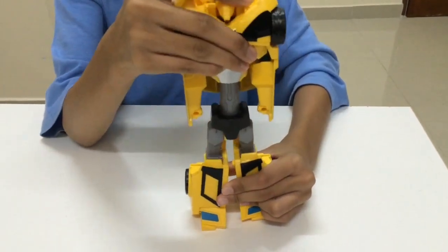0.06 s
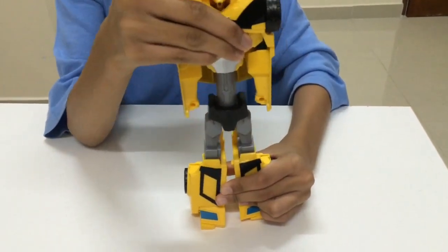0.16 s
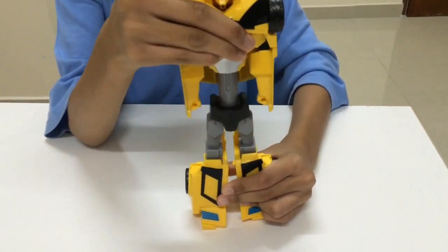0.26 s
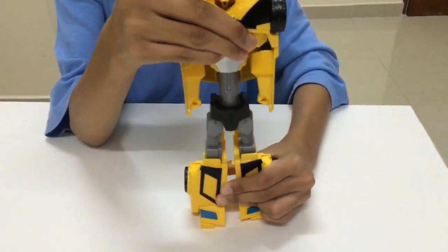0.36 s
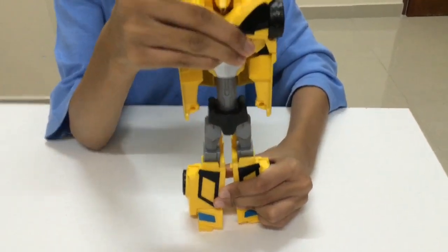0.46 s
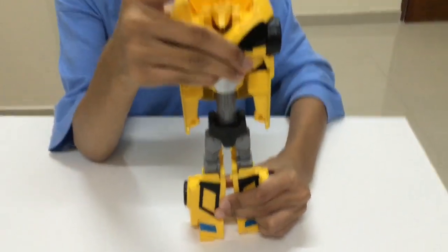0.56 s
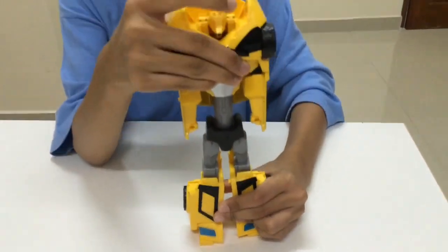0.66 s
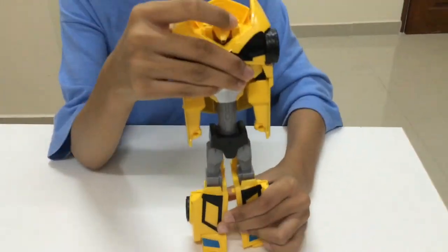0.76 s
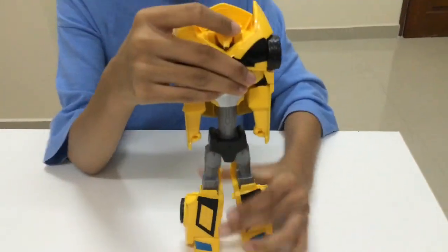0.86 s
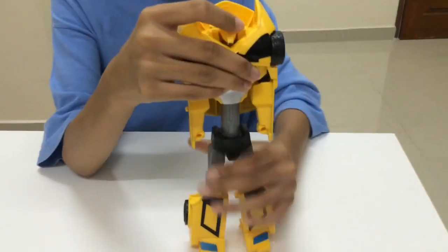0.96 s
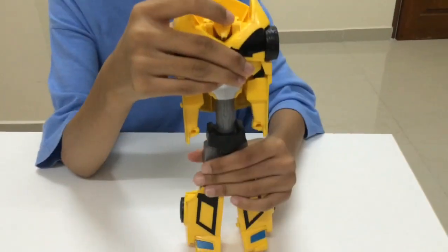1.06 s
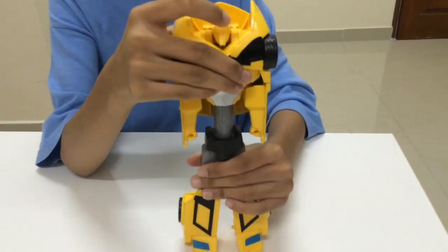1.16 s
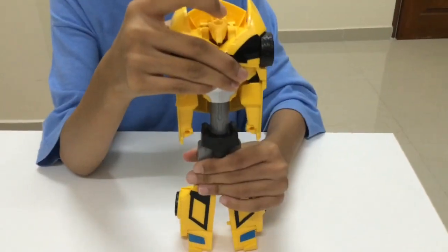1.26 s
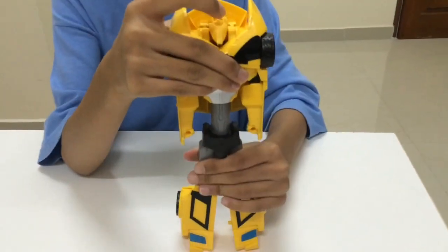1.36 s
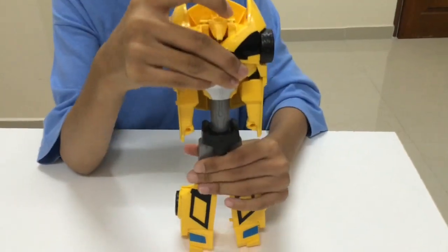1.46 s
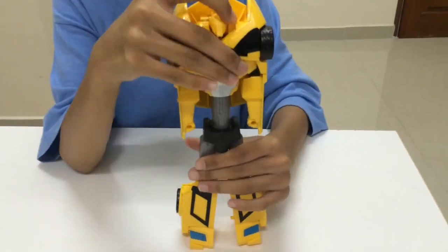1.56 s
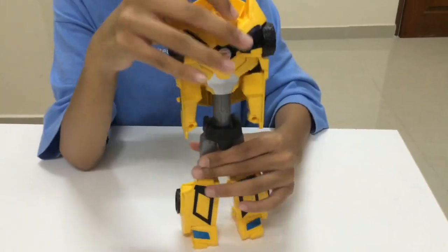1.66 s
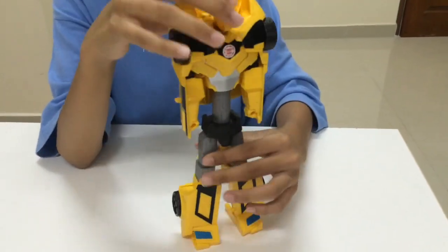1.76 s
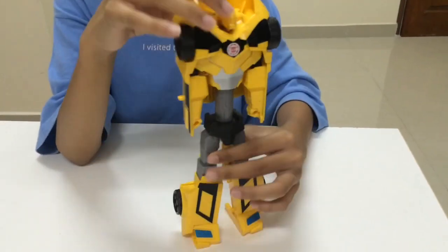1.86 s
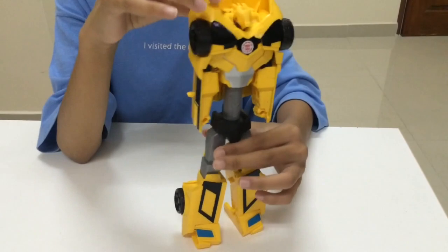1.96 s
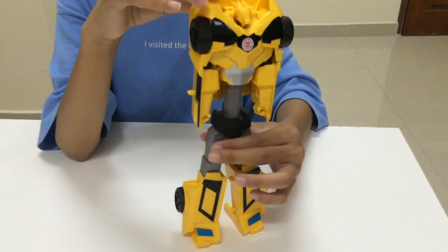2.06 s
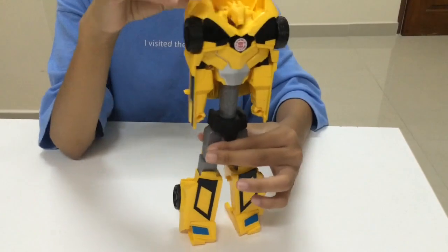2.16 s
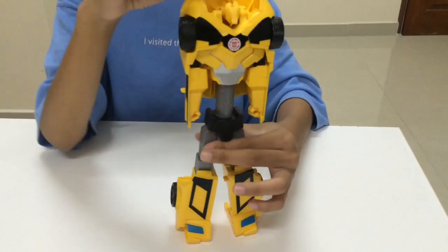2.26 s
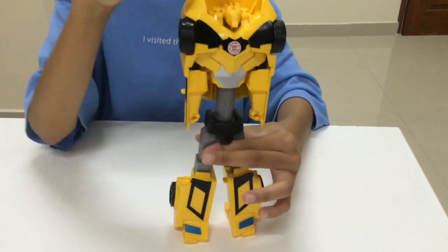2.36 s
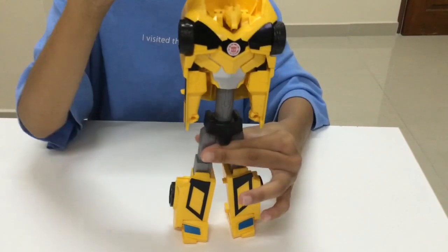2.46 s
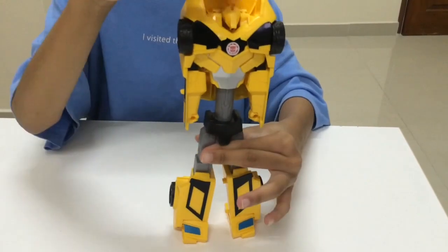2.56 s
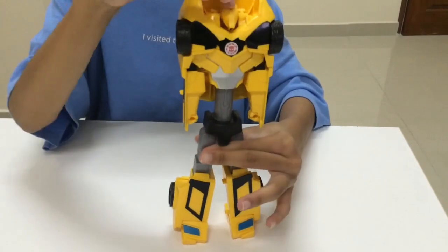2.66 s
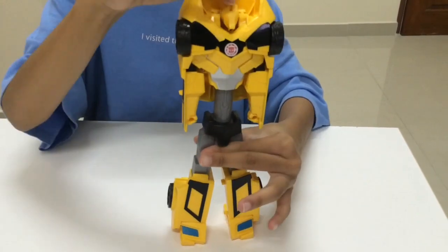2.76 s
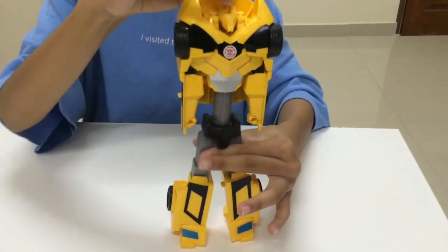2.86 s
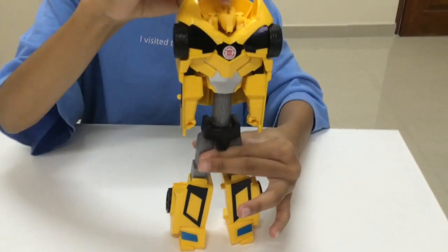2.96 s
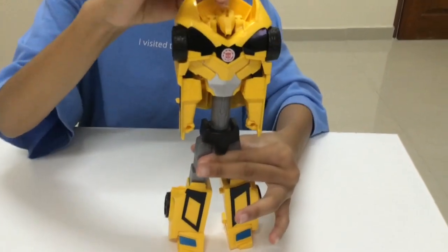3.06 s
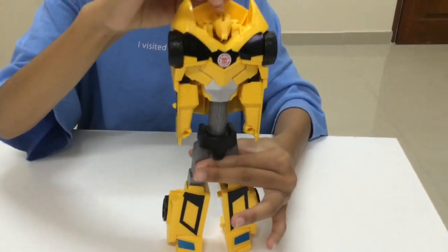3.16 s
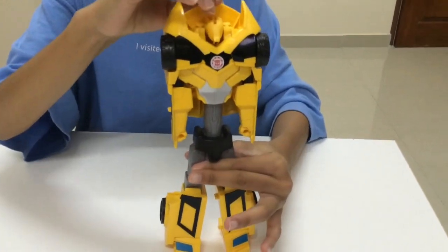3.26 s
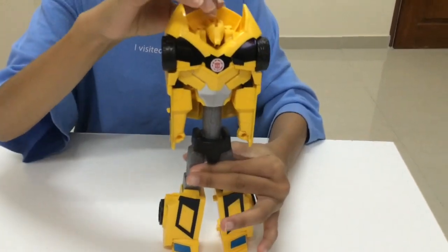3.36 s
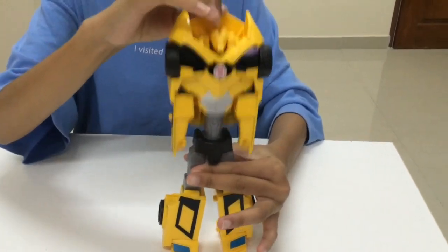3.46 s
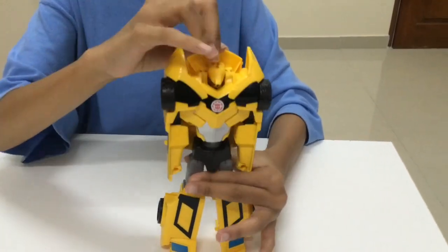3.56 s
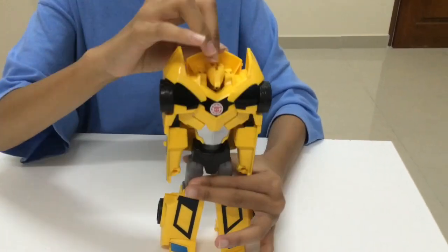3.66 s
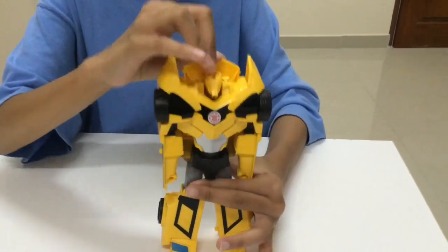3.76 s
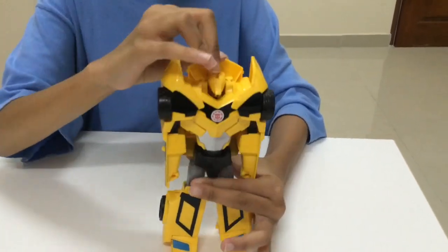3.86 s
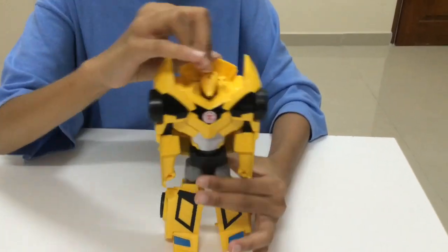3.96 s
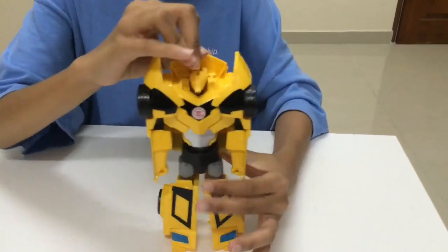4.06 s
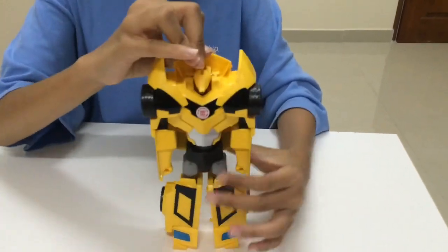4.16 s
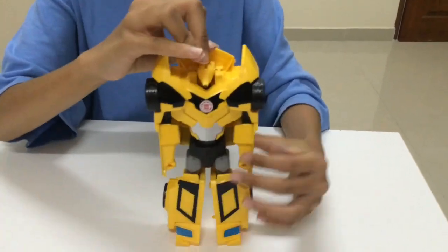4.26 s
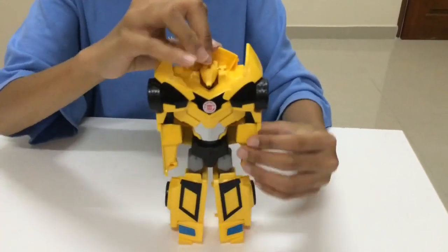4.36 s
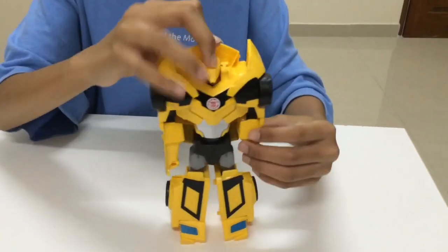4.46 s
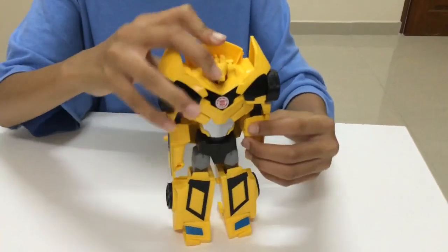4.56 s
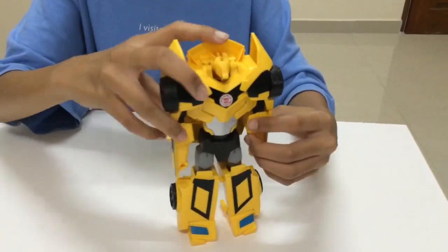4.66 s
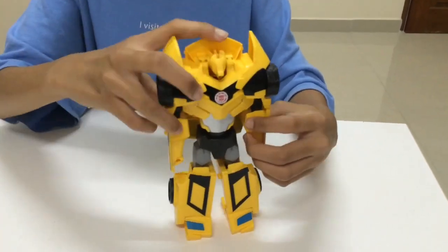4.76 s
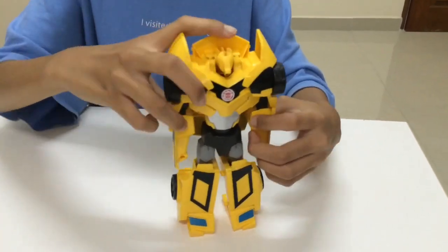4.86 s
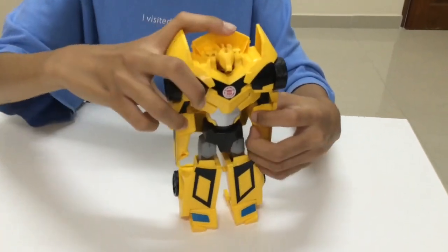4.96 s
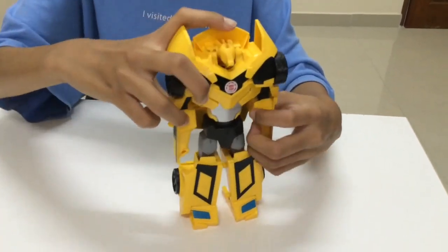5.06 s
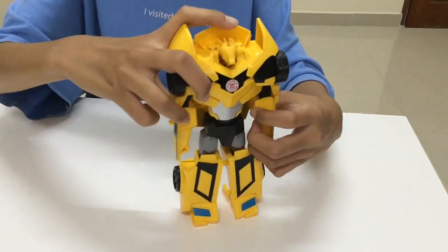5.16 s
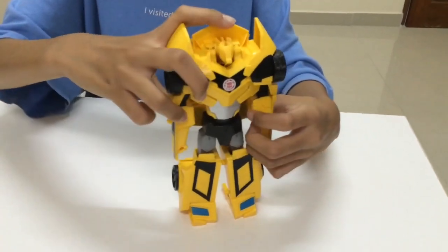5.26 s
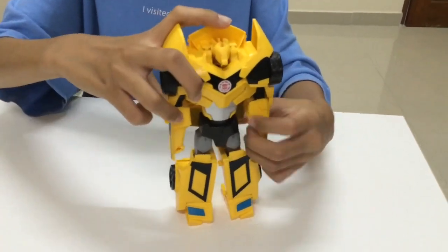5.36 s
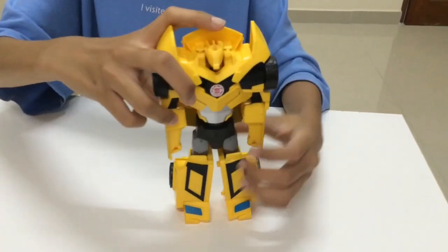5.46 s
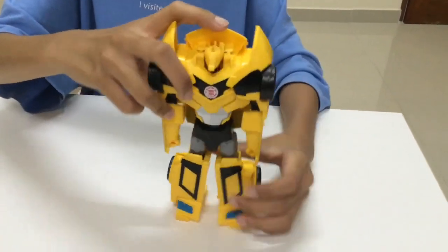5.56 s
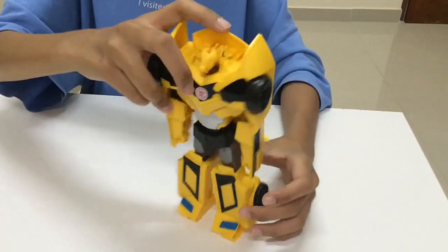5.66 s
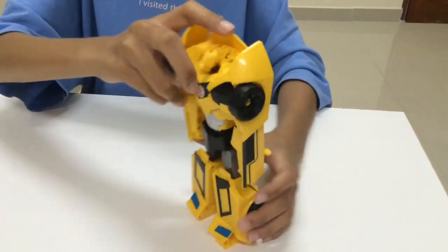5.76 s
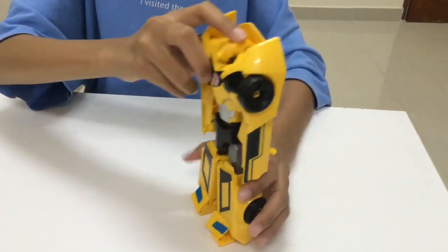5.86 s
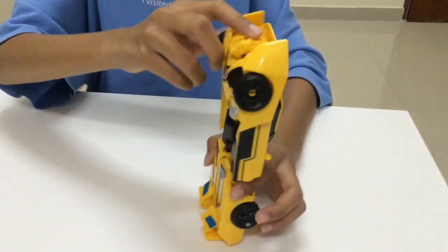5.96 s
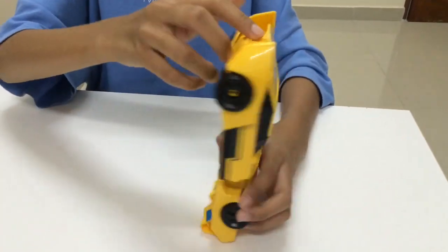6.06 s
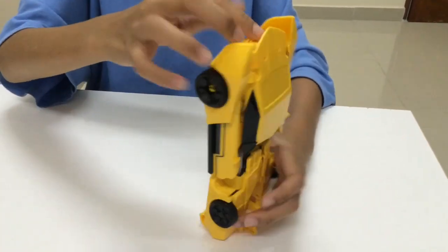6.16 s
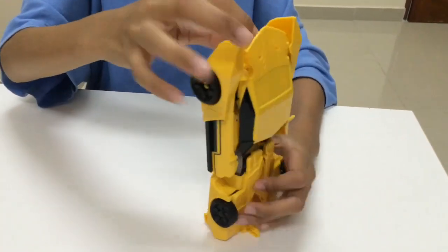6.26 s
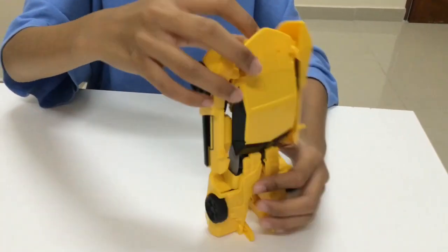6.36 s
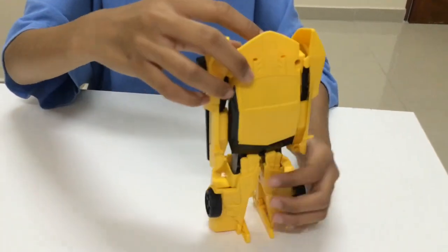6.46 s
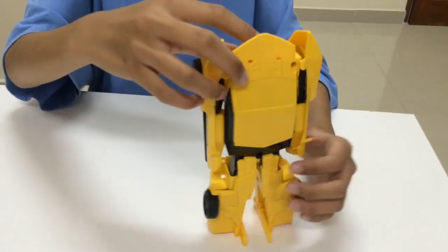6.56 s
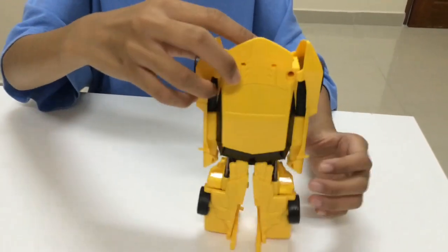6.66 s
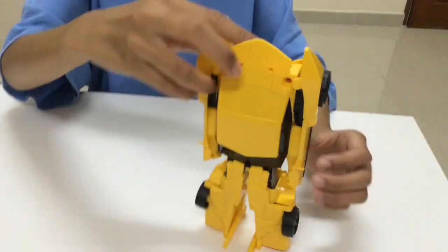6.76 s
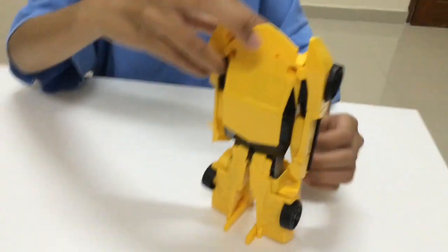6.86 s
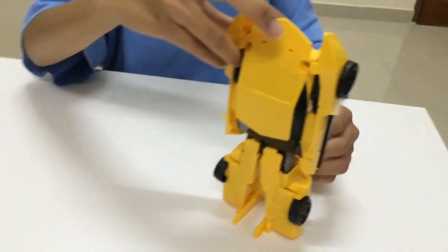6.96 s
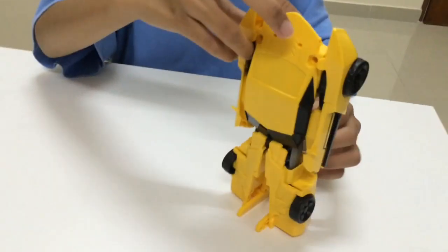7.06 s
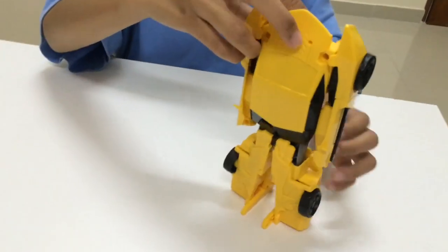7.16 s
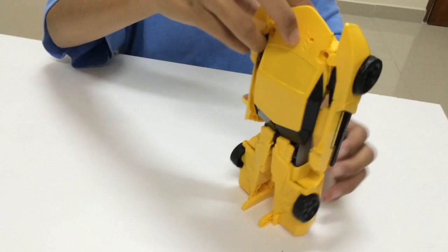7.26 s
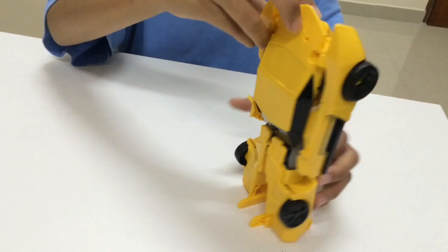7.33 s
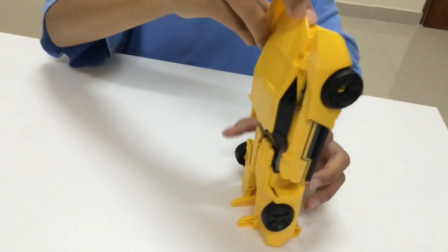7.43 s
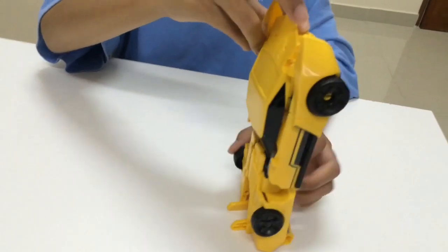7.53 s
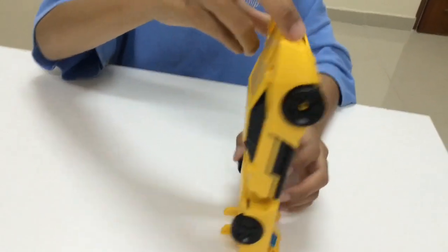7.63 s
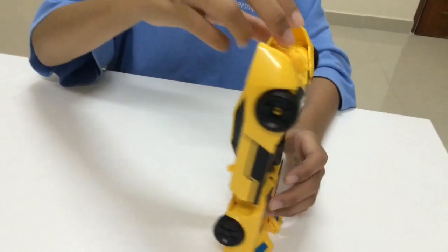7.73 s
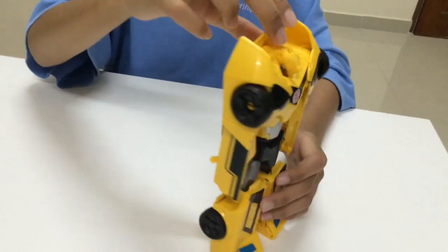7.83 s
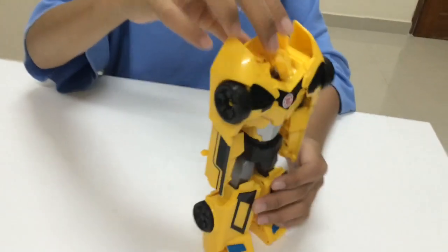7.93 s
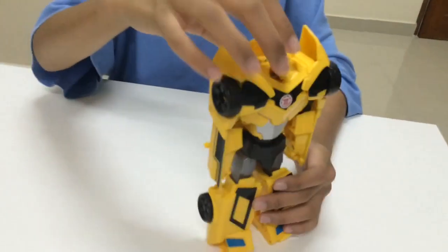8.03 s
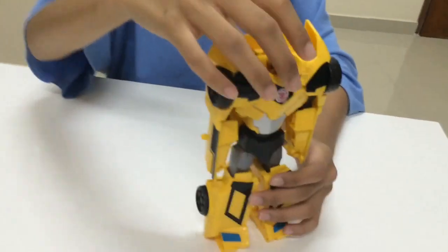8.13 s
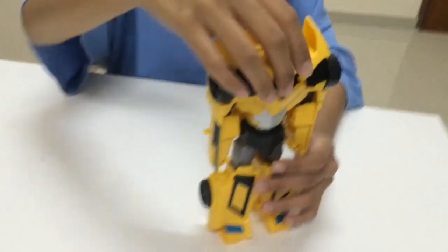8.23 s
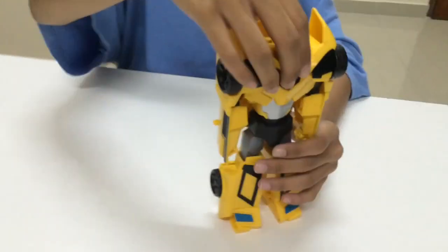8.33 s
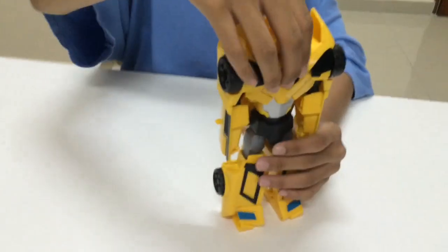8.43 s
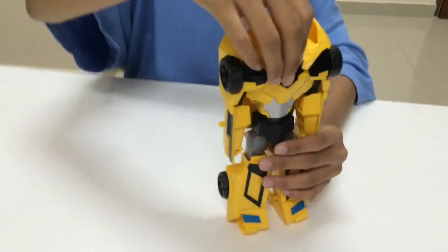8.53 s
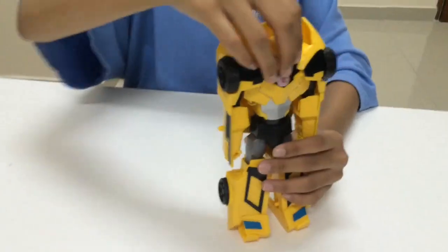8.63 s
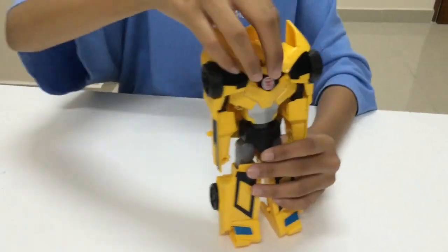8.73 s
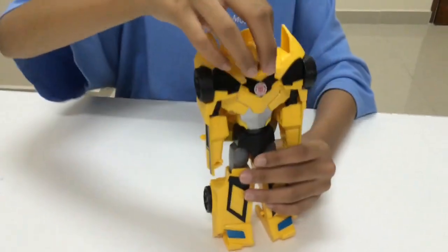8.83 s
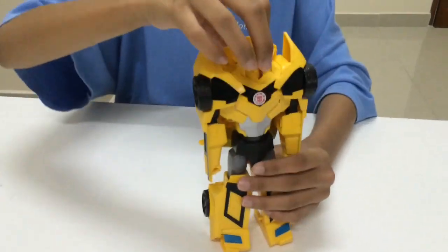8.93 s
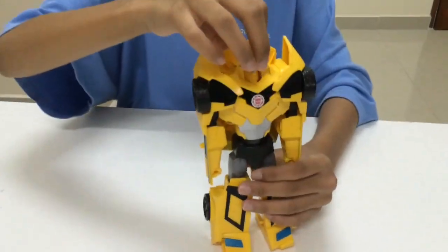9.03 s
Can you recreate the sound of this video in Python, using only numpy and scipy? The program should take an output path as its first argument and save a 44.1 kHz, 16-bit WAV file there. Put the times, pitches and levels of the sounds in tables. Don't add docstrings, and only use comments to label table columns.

```python
import sys
import numpy as np
from scipy import signal
from scipy.fft import rfft, irfft, next_fast_len
from scipy.io import wavfile
from scipy.ndimage import uniform_filter1d, map_coordinates

SR = 44100
rng = np.random.default_rng(int(sys.argv[2]) if len(sys.argv) > 2 else 0)


def level_to_linear(level):
    exponent = np.asarray(level, float) / 20
    return 10 ** exponent


def output_pcm(signal):
    pcm = np.clip(np.atleast_2d(signal).T, -1, 1) * 32767
    wavfile.write(sys.argv[1], SR, np.round(pcm).astype(np.int16))


N = 400869

# start in seconds, peak in dB, strongest panel tone in Hz, brightness in dB.
SNAPS = [(.5841, -48, 1800, -26), (1.2062, -27, 4030, -6), (3.6034, -23, 3560, -2), (3.6246, 0, 3880, -1.5),
         (3.8385, -13, 4500, 6), (3.8565, -14.5, 12500, -2), (3.8663, -8, 4130, -3),
         (4.0483, -31, 2860, -24), (4.089, -22.5, 3200, -11), (4.1035, -17, 4470, -12.5),
         (4.1158, -24, 3150, -11), (4.6008, -35.5, 4140, -2.5), (4.7256, -27, 3180, -12.5),
         (4.76, -26, 4240, -17), (4.9917, -26, 10500, -12), (5.4411, -21.5, 4460, -3.5),
         (5.8976, -54.5, 2330, -25), (5.9394, -27, 4040, -13), (5.996, -34.5, 3260, -29),
         (6.2385, -19, 3370, -5), (6.366, -39, 3200, -41), (6.4661, -35, 2390, -51),
         (6.7312, -33, 1850, -31), (7.2186, -34.5, 10300, -7), (7.2372, -28.5, 4930, -16),
         (7.2534, -23.5, 2390, 0.5), (7.3148, -31, 3400, -15), (7.5901, -19.5, 3150, -10)]
# start in seconds, peak in dB, strongest panel tone in Hz,
# brightness in dB.
TICKS = [(.078, -27, 9000, -5), (.709, -44, 3070, -4), (1.1212, -28.5, 4030, -9.5),
         (1.3419, -29.5, 2400, -16), (2.168, -37.5, 3450, -31), (2.379, -42, 3500, -8.5),
         (2.7432, -48, 2420, -48), (3.2544, -29.5, 2770, -6), (3.5822, -7.5, 3730, -27),
         (3.5916, -4.5, 3100, -5.5), (3.8912, -29, 3080, -47), (3.957, -40, 2500, -25),
         (4.0246, -28, 2000, -45), (4.0314, -25.5, 4500, -6), (4.2419, -24, 3760, -11.5),
         (4.7394, -27, 2960, -29), (3.333, -40.5, 2870, -19), (5.2696, -22.5, 3200, -9.5),
         (5.52, -40, 1870, -13), (5.8644, -29, 3420, -11), (6.0473, -33, 3150, -42),
         (6.2264, -34, 3200, -21), (6.4863, -27.5, 1860, -9.5), (6.56, -33, 2300, -40),
         (7.6433, -35, 2960, -8), (7.8125, -33, 4800, -21), (8.5625, -44, 3300, -29),
         (8.9815, -16.5, 5730, -21)]
# start in seconds, peak in dB, strongest panel tone in Hz, brightness in dB.
CLACKS = [(.04, -41, 2550, -16), (.2155, -14, 10440, -5.5), (.2383, -16, 4300, -5), (.2484, -28, 3800, -14),
          (.315, -35, 2860, -18), (.519, -46, 1650, -5.5), (.9175, -14, 3370, -9),
          (.9595, -20.5, 2400, -14.5), (1.698, -31, 3980, -22), (2.4623, -34.5, 2400, -57),
          (2.546, -26.5, 3650, -11.5), (3.5954, -8.5, 4030, -5), (4.0125, -30, 1800, -12),
          (4.057, -30.5, 3190, -17.5), (4.851, -28, 2330, -49), (4.9929, -26, 3350, -23),
          (5.1557, -37, 1870, -12.5), (5.6492, -48, 1940, -9), (5.6616, -33, 2700, -54),
          (5.8225, -31.5, 3680, -12), (6.0206, -33.5, 4060, -26), (6.1222, -23, 4600, -11),
          (6.1873, -25.5, 3380, -9.5), (6.2315, -19.5, 3250, -10.5), (7.4361, -40, 4720, -11),
          (7.6568, -27, 7370, -6.5), (8.3688, -47, 3190, -17), (8.7826, -39, 1664, -26)]
# start in seconds, peak in dB, strongest panel tone in Hz,
# brightness in dB.
RATTLES = [(.0144, -37, 2610, -12), (.1945, -22.5, 1500, -6), (.2054, -25.5, 3270, -7),
           (.2277, -23, 3030, -4), (.2596, -22, 2930, -33), (.4215, -41, 1540, -11.5),
           (.7352, -33, 3020, -32), (1.0428, -21.5, 3400, -8.5), (1.2256, -23, 2470, -8),
           (1.3129, -30, 2470, -62), (2.028, -30, 3000, -5), (2.0365, -24, 3720, -10),
           (2.0988, -19.5, 2370, -5.5), (3.236, -30.5, 2000, -12), (4.453, -23.5, 2500, -40),
           (4.7656, -22.5, 2820, -23), (5.0029, -26.5, 4300, -17.5), (5.9158, -21, 2930, -9),
           (6.0328, -52, 3240, -37), (6.1305, -18.5, 3480, -8), (7.4555, -35, 2140, -35),
           (7.517, -35, 4200, -9), (8.9825, -29, 3710, -16)]
# start in seconds, peak in dB, strongest panel tone in Hz,
# brightness in dB.
TAPS = [(.007, -34, 3930, -21), (.092, -40, 2800, -39), (.184, -24, 4170, -8), (.775, -41, 3280, -30),
        (.849, -42, 3800, -25), (.983, -30, 4300, -22), (1.111, -31, 3820, -21), (1.2105, -26, 3760, -16),
        (1.245, -28, 2500, -17), (1.272, -33, 4540, -22), (1.286, -34, 3480, -28), (1.956, -52, 3500, -8),
        (2.277, -50, 3200, -25), (2.313, -51, 3500, -25), (2.333, -46, 4040, -27), (2.683, -50, 3000, -15),
        (3.5962, -11, 1740, -9), (3.765, -38, 2300, -27), (4.05, -27, 4840, -23),
        (4.058, -29.5, 4700, -15.5), (4.123, -26.5, 3180, -12), (4.445, -49, 2240, -25),
        (4.607, -35.5, 4300, -20), (4.75, -28, 4300, -14), (4.776, -34, 2880, -25), (4.787, -30, 3200, -20),
        (4.97, -42, 4400, -22), (5.011, -21, 4370, -17.5), (5.6887, -31.5, 3380, -23),
        (5.7251, -41, 4600, -19), (5.8, -45, 2820, -24), (5.923, -25.5, 3050, -19),
        (6.157, -26.5, 4300, -20), (6.433, -40, 1880, -12), (6.52, -28, 4730, -35), (6.536, -36, 3270, -29),
        (6.672, -44, 3600, -20), (6.84, -44, 2420, -26), (7.067, -56, 5140, -13), (7.185, -41, 4900, -27),
        (7.3747, -47, 2010, -20), (7.473, -48, 4920, -20), (7.537, -44, 2500, -15), (7.807, -38, 4460, -25),
        (7.829, -49, 3500, -33), (8.123, -43, 5030, -21.5), (8.733, -56.5, 4680, -27.5),
        (8.799, -36.5, 3130, -25.5), (8.94, -47, 4150, -23), (8.967, -36.5, 4020, -25)]
SNAP_S, TICK_S, CLACK_S, RATTLE_S, TAP_S = 0.018, 0.015, 0.045, 0.051, 0.02

# start in seconds, length in seconds, peak in dB, pitch in Hz.
CREAKS = [(0.196, 0.022, -26.5, 465), (0.782, 0.055, -48.5, 3530), (0.923, 0.035, -32, 2740),
          (0.918, 0.027, -39, 1400), (0.959, 0.071, -39, 450), (1.228, 0.031, -27, 800),
          (1.23, 0.018, -27.5, 540), (1.232, 0.029, -29.5, 2480), (1.321, 0.036, -39.5, 2440),
          (2.03, 0.016, -33, 490), (2.033, 0.0062, -28, 10200), (2.261, 0.068, -51, 465),
          (2.411, 0.036, -48, 8640), (2.41, 0.033, -58, 6160), (2.468, 0.071, -50, 2500),
          (2.47, 0.056, -44, 490), (3.546, 0.041, -39, 570), (3.602, 0.011, -14.5, 449),
          (3.603, 0.024, -20.5, 605), (3.582, 0.014, -17, 1316), (3.871, 0.0383, -32, 980),
          (3.873, 0.077, -39, 4300), (4.012, 0.018, -34, 1590), (4.015, 0.027, -39, 574),
          (4.09, 0.033, -54, 490), (4.103, 0.0107, -28.5, 1650), (4.139, 0.02, -34.5, 4480),
          (4.205, 0.016, -41, 3000), (4.225, 0.01, -34, 2440), (4.253, 0.041, -44, 2750),
          (4.462, 0.04, -42.5, 2940), (4.715, 0.02, -38.5, 1780), (5.648, 0.048, -36, 600),
          (5.66, 0.04, -42, 1250), (5.663, 0.093, -42.5, 3130), (5.733, .018, -49.5, 2410),
          (6.032, 0.02, -33.5, 3220), (6.145, 0.038, -59, 700), (6.233, 0.017, -38, 1770),
          (6.258, 0.015, -36, 6600), (6.475, 0.041, -45, 870), (6.703, 0.2, -57, 4120),
          (7.393, 0.044, -53.5, 4170), (7.466, 0.032, -48, 2100), (7.592, 0.057, -46, 3060),
          (7.75, 0.048, -49.5, 2210), (7.818, 0.0091, -46, 650), (8.094, 0.087, -59, 3900),
          (8.834, 0.033, -48, 1333), (8.836, 0.031, -46.5, 4100)]
CREAK_WIDTH, CREAK_EDGE_S, CREAK_SLIPS_PER_S = 0.07, 0.0023, 1600

# start in seconds, peak in dB.
PLUCKS = [
    (2.0343, -44),
    (2.0986, -32),
    (2.5443, -36),
]
# pitch in Hz, level in dB, seconds to fall by 60 dB.
SPRING_TONES = [(8130, 0, .03), (8150, -26, .33), (9900, -3, .015)]

# start in seconds, peak in dB, thud in dB, brightness in dB per octave.
KNOCKS = [(0.191, -16.5, -4, -2), (0.257, -25, 7, 15), (0.827, -32.5, -14, 9), (0.955, -50, 15, 0.1),
          (1.225, -13.5, -37, 7), (2.0268, -24, -15, 8), (2.098, -29, -30, 23), (2.267, -41.5, -12, 8),
          (2.545, -32.5, -33, 17), (3.248, -28.5, -7, 7.5), (3.544, -39, -12, -9), (3.584, -26, 5, -5),
          (3.592, -14, -27, 10), (3.6029, -15.5, -31.5, -5), (3.838, -21, -30, 13.5), (4.013, -24.5, -6, 1),
          (4.082, -22, -11, 1), (4.228, -29, -10, -3), (4.454, -29, -14, -3), (4.852, -26.5, -30, 9),
          (5.009, -38.5, -2, -4.5), (5.656, -32, 1, 12.5), (5.824, -36.5, 0, 8), (5.912, -29.5, 8.5, 6),
          (6.141, -27.5, -4, -3), (6.48, -36.5, -9, -3), (7.212, -38.5, 13, -9), (7.252, -37.5, -13, 6),
          (8.78, -28.5, -6, -10), (8.841, -32.5, -16, -5), (8.957, -34.5, -6, -6)]
# start in seconds, peak in dB.
ROCKS = [
    (0, -40.5),
    (.24, -43),
    (1.228, -29),
    (3.285, -39.5),
    (3.875, -32.5),
    (3.925, -37.5),
    (4.099, -44),
    (5.58, -46.5),
    (5.926, -38),
]
# start in seconds, peak in dB.
BUMPS = [
    (.222, -30),
    (6.226, -34),
    (8.862, -31.5),
    (8.957, -31.5),
    (8.99, -37),
    (9.05, -33),
]
# pitch in Hz, width in Hz, level in dB.
TABLE_TOP = [(262, 33, 4.5), (333, 35, 3.5), (463.6, 32, 5), (603, 34, 0.5), (678, 7.3, -1),
             (771, 20, -3.5), (997, 13, -4.5), (1110, 24, -10.5), (1480, 540, -17)]
# pitch in Hz, width in Hz, level in dB.
TABLE_LEGS = [(59.7, 7.9, -1.6), (105.3, 14, 1)]
# pitch in Hz, width in Hz, level in dB.
TABLE_BOARD = [(159.2, 5.7, 0.5), (192.9, 11, -1.9)]

# pitch in Hz, width in Hz, level in dB.
PANEL_TONES = [(1500, 1000, -8.5), (2000, 83, 2.5), (2470, 42, 2), (2960, 1900, -2.5), (4030, 53, -5),
               (4300, 490, -1.5), (4940, 690, -12.5)]
# frequency in Hz, level in dB per Hz.
RUB_COLOUR = [(500, -44.5), (1000, -15), (1600, 6.5), (3000, 17), (4500, -17), (9000, -50), (16000, -41.5)]
# frequency in Hz, level in dB per Hz.
SKIN_COLOUR = [(2000, -33), (6000, -3.5), (10000, -3), (16000, -9.5)]
# time in seconds, activity in dB.
FINGERS = [(0, -3), (.43, 8.5), (.56, -7), (.8, 12), (1.1, -15), (1.4, -5), (2.45, 2), (2.72, -12.5),
           (3.15, -8.5), (3.9, -6), (4.3, -4), (4.75, 2.5), (5.3, -2), (5.95, 0.5), (6.66, 0), (6.9, 6),
           (8.2, 0.5), (8.5, 0.5)]
# level in dB at an activity of 0 dB, dB per dB of activity.
PANEL_RUB, SKIN_HISS, FOOT_DRAG, TABLE_SWAY = (-71.5, 0.51), (-75, 0.91), (-73.5, 0.77), (-57.5, 0.56)
# middle in seconds, half length in seconds, rub in dB,
# hiss in dB.
SLIDES = [(0, 0.037, -38, -45), (0.986, 0.082, -53.5, -77), (1.053, 0.037, -45.5, -68),
          (1.134, 0.015, -60, -63), (1.239, 0.014, -36.5, -72), (1.699, 0.03, -59.5, -63),
          (2.436, 0.015, -82, -66), (3.597, 0.02, -24.5, -25), (3.667, 0.042, -45, -39.5),
          (3.857, 0.018, -33.5, -44), (4.041, 0.014, -38, -67), (4.115, 0.037, -38.5, -72),
          (4.243, 0.0095, -40, -75), (4.661, 0.019, -58, -63.5), (4.585, 0.015, -64, -70),
          (4.782, 0.053, -47, -57.5), (4.869, 0.023, -44.5, -86), (5.004, 0.023, -45, -71),
          (5.689, 0.021, -53.5, -68), (6.039, 0.024, -45, -63.5), (6.2, 0.076, -50, -59),
          (6.502, 0.03, -41.5, -74), (6.724, 0.027, -55.5, -71), (7.146, 0.0087, -60, -55.5),
          (7.262, 0.024, -46, -88.5), (7.774, 0.26, -66, -92), (8.126, 0.04, -56.5, -78),
          (8.85, 0.04, -55.5, -68.5)]
SLIDE_TAIL = 0.84
# strongest moment in seconds, board sway in dB, drag of the feet in
# dB, seconds to fade by 60 dB.
SHOVES = [(0, -33, -75, 0.2), (0.228, -26.5, -36.5, 0.25), (1.0, -47, -82, 0.74), (1.24, -38.5, -45, 0.4),
          (2.03, -47, -83, 0.42), (2.46, -50.5, -57.5, 0.97), (3.248, -39, -50.5, 0.29),
          (3.62, -34, -33.5, 0.42), (3.85, -43.5, -48, 1.06), (4.097, -38, -47, 0.13),
          (4.451, -40.5, -83, 0.34), (4.729, -45.5, -76, 0.44), (4.86, -35.5, -58, 0.18),
          (5.01, -47.5, -68.5, 0.51), (5.66, -66.5, -52.5, 1.4), (6.03, -39, -78, 0.38),
          (6.19, -41.5, -52.5, 0.69), (6.491, -37, -70, 0.29), (7.241, -47.5, -79, 0.22),
          (7.92, -42.5, -65, 0.83), (8.14, -43, -71.5, 0.25), (8.798, -36, -67, 0.27),
          (8.83, -39.5, -60, 0.31), (8.961, -34, -52, 0.32)]
SHOVE_RISE_DB_PER_S = 548.5

# frequency in Hz, seconds to fall by 60 dB.
WALL_RING = [(200, 0.25), (1000, 0.21), (3000, 0.33), (8000, 0.18), (15000, 0.26)]
# frequency in Hz, level in dB per Hz.
HUM_COLOUR = [(12, -53), (20, -25.5), (109, -16.5), (191, -2), (372, -14.5), (534, -19), (631, -14.5),
              (857, -20), (1070, -17), (1670, -28.5), (4310, -39.5), (13900, -40.5), (15500, -49.5)]
HUM_DB = -56
TOP_HZ = 15300


def unit(x):
    return x / np.sqrt(np.mean(x ** 2) + 1e-20)


def along(points, hz):
    f, value = np.transpose(points)
    return np.interp(np.log(hz + 1), np.log(f + 1), value)


def filtered(x, response):
    size = next_fast_len(x.shape[-1] + 8192)
    spectrum = rfft(x, size) * response(np.fft.rfftfreq(size, 1 / SR))
    return irfft(spectrum, size)[..., :x.shape[-1]]


def resonant(modes):
    def response(f):
        total = 0
        for k, (hz, width, db) in enumerate(modes):
            sign = (-1) ** k
            total = total + sign * level_to_linear(db) * 1j * f * width / (hz * hz - f * f + 1j * f * width)
        return total
    return response


def placed(times, peak_db, shapes):
    shapes = shapes * (level_to_linear(peak_db) / np.abs(shapes).max(axis=1))[:, None]
    at = np.round(times * SR).astype(int)[:, None] + np.arange(shapes.shape[1])
    return np.bincount(at.ravel(), shapes.ravel(), N + SR)[:N]


def grit(rate, spread_db):
    luck = rng.random((3, N))
    happens = luck[0] < rate / SR
    size = level_to_linear(-spread_db * np.log(luck[2] + 1e-3))
    return happens * np.sign(luck[1] - .5) * size


def wobble(rate):
    knots = rng.standard_normal(int(N * rate / SR) + 4)
    return map_coordinates(knots, [np.arange(N) * rate / SR])


def snaps(count=10):
    kinds = (SNAPS, SNAP_S), (TICKS, TICK_S), (CLACKS, CLACK_S), (RATTLES, RATTLE_S), (TAPS, TAP_S)
    blows = [(*row, t60) for rows, t60 in kinds for row in rows]
    s, db, hz, bright_db, t60 = (c[:, None] for c in np.transpose(blows))
    t = np.arange(SR // 25) / SR
    luck = rng.random((len(s), 2 * count + len(t)))
    fade = level_to_linear(-60 * t / np.clip(t60, .003, .07)) * (1 - np.exp(-t / 0.00022))
    chatter = (luck[:, 2 * count:] - .5) ** 3 * fade
    chatter = chatter * (1 + 2.6 * np.exp(-t / 0.00026))

    def tilt_db(f):
        return (bright_db + 4.0) * np.clip((f - 5500) / 4000, 0, 1.2)

    def average(f):
        return level_to_linear(tilt_db(f)) * (f / (f + 800)) ** 2

    def damped(f):
        small = 1j * f / (1j * f + 0.2 * np.minimum(hz, 4000))
        soft_hz = 14000 * level_to_linear(1.1 * np.minimum(bright_db, 0))
        return small ** 2 / (1 + 1j * f / soft_hz)

    modes = [(hz, 350, 5)]
    for k in range(count):
        mode_hz = 1000 + 1400 * (k + luck[:, [k]])
        mode_db = tilt_db(mode_hz) - 3 - 8 * luck[:, [count + k]]
        modes.append((mode_hz, 300 + 0.017 * mode_hz, mode_db))
    panels, blurred = resonant(modes), resonant([(hz, 900, -3)])
    near = filtered(chatter, lambda f: (panels(f) + level_to_linear(-1.5) * average(f)) * damped(f))
    spread = filtered(chatter, lambda f: (average(f) + blurred(f)) * damped(f) / (1 + f / 12000))
    return placed(s[:, 0] - .0002, db[:, 0], near), placed(s[:, 0], db[:, 0], spread)


def creaks():
    s, length, db, hz = (c[:, None] for c in np.transpose(CREAKS))
    t = np.arange(SR // 5) / SR
    luck = rng.random((len(s), 2, len(t)))
    slips = (luck[:, 0] < CREAK_SLIPS_PER_S / SR) * (luck[:, 1] - .5)
    fade_in = np.clip(t / CREAK_EDGE_S, 0, 1)
    fade_out = np.clip((length - t) / CREAK_EDGE_S + 1, 0, 1)
    mode = resonant([(hz, CREAK_WIDTH * hz * (hz / 500) ** 0.25, 0)])
    broad = resonant([(hz, 1.1 * hz, 0)])
    singing = filtered(slips * fade_in * fade_out, lambda f: mode(f) * broad(f))
    return placed(s[:, 0], db[:, 0], singing)


def spring():
    s, db = np.transpose(PLUCKS)
    t = np.arange(SR // 3) / SR
    ring = sum(level_to_linear(level - 60 * t / t60) * np.sin(2 * np.pi * hz * t) for hz, level, t60 in SPRING_TONES)
    noise = rng.standard_normal((len(s), len(t)))
    buzz = unit(uniform_filter1d(noise, size=55, axis=1))
    return placed(s + .001, db + 8, ring * (1 + .8 * buzz))


def handling():
    rub_gain, hiss_gain, drag_gain, sway_gain = efforts()
    drag_gain = drag_gain + level_to_linear(-4.0) * rub_gain
    clumps = level_to_linear(2.6 * wobble(120))
    scrape = clumps * grit(2300, spread_db=2.0)
    ring = np.zeros(N)
    for k, mode in enumerate(PANEL_TONES):
        grip = level_to_linear(4 * wobble(13))
        ring += (-1) ** k * grip * filtered(scrape, resonant([mode]))
    ring = filtered(ring, lambda f: 1 / (1 + 1j * f / 6000) ** 2)
    plain_scrape = filtered(scrape, lambda f: level_to_linear(along(RUB_COLOUR, f)))
    rub = unit(unit(ring) + 0.8 * unit(plain_scrape))
    brushing = clumps ** 0.64 * level_to_linear(2.1 * wobble(14)) * grit(10000, spread_db=2.5)
    hiss = unit(filtered(brushing, lambda f: level_to_linear(along(SKIN_COLOUR, f))))
    top = resonant(TABLE_TOP)
    drag = unit(filtered(grit(2500, spread_db=1.5), lambda f: top(f) * (f / (f + 500)) ** 2))
    sway = unit(filtered(grit(900, spread_db=2.0), resonant(TABLE_BOARD)))
    shaking = unit(filtered(rng.standard_normal(N), resonant(TABLE_LEGS)))
    tremble = level_to_linear(-29.5) * sway_gain ** 0.52 * shaking
    return tremble + rub_gain * rub + hiss_gain * hiss + drag_gain * drag + sway_gain * sway


def efforts():
    t = np.arange(0, N / SR + .002, .001)
    busy_db = np.interp(t, *np.transpose(FINGERS))
    driven = PANEL_RUB, SKIN_HISS, FOOT_DRAG, TABLE_SWAY
    rub, hiss, drag, sway = (level_to_linear(db + slope * busy_db) for db, slope in driven)
    middle, half, rub_db, hiss_db = np.transpose(SLIDES)
    past = (t[:, None] - middle) / half
    swell = np.exp(-np.where(past < 0, past ** 2, past / SLIDE_TAIL))
    s, sway_db, drag_db, t60 = np.transpose(SHOVES)
    since = t[:, None] - s
    shove = level_to_linear(np.where(since < 0, SHOVE_RISE_DB_PER_S, -60 / t60) * since)
    rub, hiss = rub + swell @ level_to_linear(rub_db), hiss + swell @ level_to_linear(hiss_db)
    drag, sway = drag + shove @ level_to_linear(drag_db), sway + shove @ level_to_linear(sway_db)
    return [np.interp(np.arange(N) / SR, t, gain) for gain in (rub, hiss, drag, sway)]


def knocks():
    s, db, thud_db, tilt_db = np.transpose(KNOCKS)
    t = np.arange(SR // 3) / SR
    push = np.tile(np.exp(-((t - .001) / 0.00031) ** 2), (len(s), 1))
    scuff = .25 * level_to_linear(-60 * (t - .003) / .12) * (t > .003) * rng.standard_normal(push.shape)
    direct = 0.51 * filtered(push, lambda f: 1j * f / (250 + 1j * f))
    struck = resonant([(hz, w, level + tilt_db[:, None] * np.log2(hz / 460)) for hz, w, level in TABLE_TOP])
    ringing = filtered(push + scuff, lambda f: struck(f) / (1 + 1j * f / 2500))
    top = placed(s, db - 2.0, direct + ringing)
    thud = placed(s, db + thud_db - 9.0, filtered(push + scuff, resonant(TABLE_LEGS + TABLE_BOARD)))

    s, db = np.transpose(ROCKS)
    shove = np.tile(np.exp(-((t - .012) / .004) ** 2), (len(s), 1))
    rock = placed(s, db, filtered(shove, resonant(TABLE_LEGS)))

    s, db = np.transpose(BUMPS)
    swing = np.sin(2 * np.pi * TABLE_BOARD[0][0] * t) * level_to_linear(-60 * t / 0.16) * (1 - np.exp(-t / .008))
    bump = placed(s, db, np.tile(swing, (len(s), 1)))
    return top + thud + rock + bump


def walls(x, count=5):
    out = np.zeros(N)
    turn = (np.arange(N) * 7 // SR) % count
    for k in range(count):
        hz, t, noise = signal.stft(rng.standard_normal(SR // 2), SR, nperseg=256)
        fading = noise * level_to_linear(-60 * t / along(WALL_RING, hz)[:, None])
        tail = signal.istft(fading, SR, nperseg=256)[1]
        tail = np.pad(tail / np.linalg.norm(tail), (500, 0))
        out += signal.fftconvolve(x * (turn == k), tail)[:N]
    return out


def hum():
    noise = filtered(rng.standard_normal(N), lambda f: level_to_linear(along(HUM_COLOUR, f)))
    return level_to_linear(HUM_DB - 3.5) * unit(noise)


def scene():
    near, spread = snaps()
    table, steel, creak = knocks(), spring(), creaks()
    echo = walls(level_to_linear(-11) * spread + level_to_linear(-3) * table + level_to_linear(-15) * steel + level_to_linear(-9) * creak)
    return (near + steel + table + creak + echo + handling() + hum())[None]


def low_pass(x):
    return signal.sosfilt(signal.butter(12, 16490, fs=SR, output="sos"), x)


def record(dry):
    heard = filtered(dry, lambda f: 1 / (1 + (f / TOP_HZ) ** 150) + level_to_linear(-36))
    return low_pass(np.clip(heard, -1, 1))


dry = scene()
out = record(dry)
output_pcm(out)
```